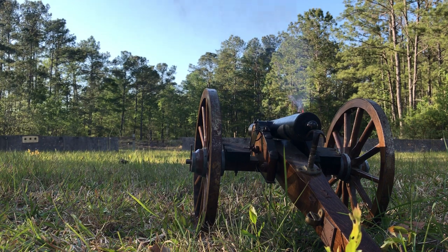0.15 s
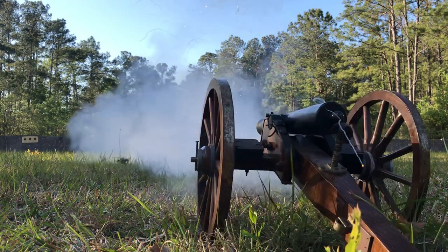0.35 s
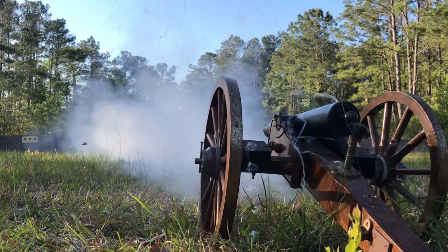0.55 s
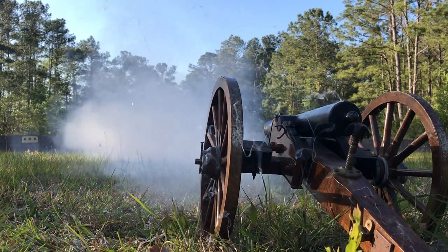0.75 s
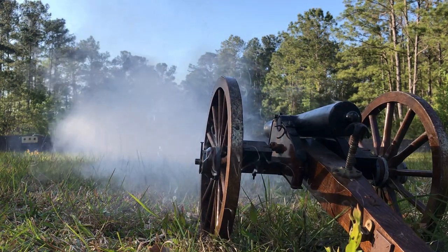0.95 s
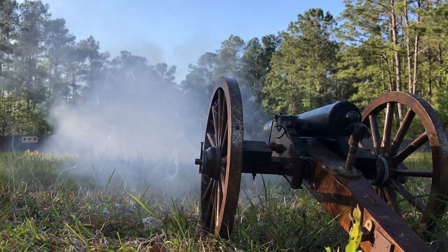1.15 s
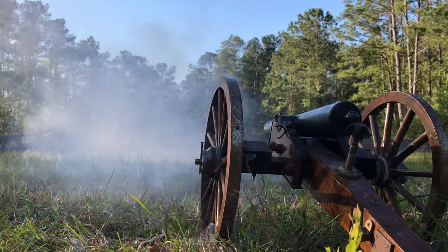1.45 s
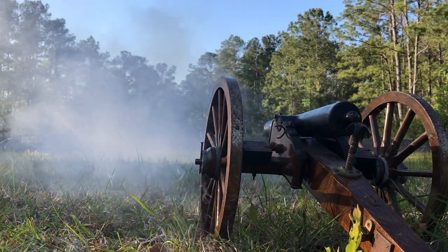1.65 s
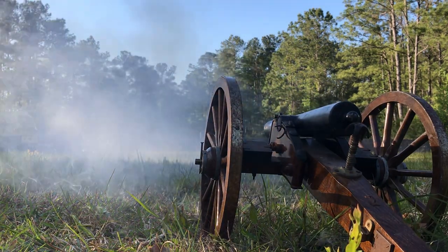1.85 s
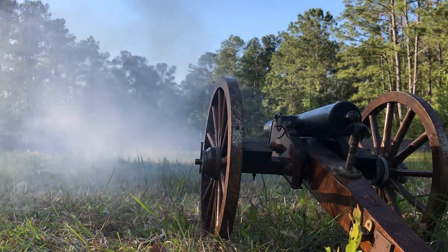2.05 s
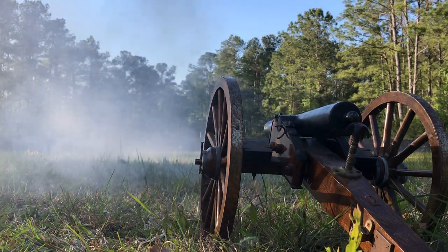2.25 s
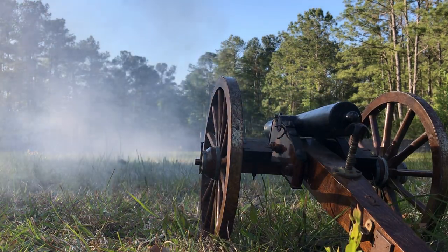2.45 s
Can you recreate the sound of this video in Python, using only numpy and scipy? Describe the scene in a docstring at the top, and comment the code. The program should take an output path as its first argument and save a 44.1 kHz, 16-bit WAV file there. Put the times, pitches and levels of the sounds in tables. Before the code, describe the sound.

A cannon fires in a grassy field ringed by forest, heard close. Faint hiss until 0.22 s, then a primer spit and short gas whistle run into a clipped crack and deep boom at 0.25 s. Dull thuds and bright scattered hiss return until 0.85 s, with grass crackling under recoil. Rumble and roar swell near 1.1 s, darken and fade; a tiny click at 2.07 s, quiet until 2.6 s.

```python
"""A muzzle-loading cannon fires in a field ringed by forest: primer spit, vent whistle, boom, cracks, a deep swing.
Shaped noise makes the gas sounds; short cosine swings make the blast wave and the thuds the trees return.
The forest answers with rumble, roar and a hiss that dulls with distance, while the carriage recoils in dry grass.
A close camera overloads on the blast and turns its gain down; a very deep rumble of wind comes in late."""
import sys
import numpy as np
from scipy import signal
from scipy.fft import rfft, irfft, next_fast_len
from scipy.io import wavfile
from scipy.ndimage import uniform_filter1d, map_coordinates

SR = 44100
rng = np.random.default_rng(int(sys.argv[2]) if len(sys.argv) > 2 else 0)


def transcribe(signal):
    """Save signal, clipped to [-1, 1], as a 16-bit WAV file at the path in sys.argv[1]."""
    frames = np.atleast_2d(signal).T
    limited = np.clip(frames, -1, 1)
    pcm = np.round(limited * 32767).astype(np.int16)
    wavfile.write(sys.argv[1], SR, pcm)


N = 114660  # samples, 2.6 s
# All source levels are those at the microphone, ahead of the gain control in record().


def amp(db):
    """Decibels to gain."""
    return 10 ** (np.asarray(db) / 20)


def clock():
    """The time of every sample in seconds."""
    return np.arange(N) / SR


def along(points, hz):
    """Interpolates (f/Hz, level/dB) points on a log frequency axis."""
    f, v = np.transpose(points)
    return np.interp(np.log(hz + 1), np.log(f + 1), v)


def level(points):
    """Gain per sample from (t/s, level/dB) points, silent before the first."""
    s, db = np.transpose(points)
    return amp(np.interp(clock(), s, db, left=-200))


def filtered(x, response):
    """x times a response of frequency, padded so that the end does not wrap onto the start."""
    m = next_fast_len(N + SR // 2)
    hz = np.fft.rfftfreq(m, 1 / SR)
    return irfft(rfft(x, m) * response(hz), m)[:N]


def noise(spectrum, grain=0):
    """Coloured noise of rms 1; grain makes it spiky."""
    spikes = np.exp(grain * np.clip(rng.standard_normal(N), -2, 2))
    white = rng.standard_normal(N) * spikes
    x = filtered(white, lambda hz: amp(along(spectrum, hz)))
    return x / x.std()


def steady(x, size):
    """Noise with its power evened out over size samples."""
    power = np.abs(uniform_filter1d(x * x, size))
    return x / np.sqrt(power + 1e-9)


def burst(start, rise, hold, t60):
    """Attack, hold and exponential release, all times in seconds."""
    t = clock() - start
    attack = np.clip(t / rise, 0, 1) ** 2
    return attack * amp(-60 * np.maximum(t - rise - hold, 0) / t60)


def faded(x, db_per_s):
    """Each frequency loses its own dB per second: a later return has travelled a longer path."""
    shot_s = 0.27  # the paths count from here
    hz, t, z = signal.stft(x, SR, nperseg=1024)
    loss_db = db_per_s(hz)[:, None] * np.maximum(t - shot_s, 0)
    return signal.istft(z * amp(-loss_db), SR, nperseg=1024)[1][:N]


def thud(s, hz, width):
    """A short pressure swing around one trough at s, under a bell curve width seconds wide."""
    t = clock() - s
    return -np.cos(2 * np.pi * hz * t) * np.exp(-(t / width) ** 2)


def wobble(rate):
    """A smooth random curve, rate knots a second."""
    return map_coordinates(rng.standard_normal(size=2000), [clock() * rate], mode="wrap")


def floor():
    """The faint constant hiss under everything: coloured noise."""
    # colour of the hiss: f/Hz, level/dB
    floor_colour = [(30, 8), (200, 5.5), (600, -1), (1000, -5.5), (1900, 1), (2900, -5), (4400, 2),
                    (7000, -2), (9000, -0.5), (10500, -6), (12000, -1), (15500, -2.5)]
    return amp(-74.5) * noise(floor_colour)


def boom():
    """The body of the muzzle blast: low noise with an even power, soft in its rise."""
    # colour of the boom: f/Hz, level/dB
    boom_colour = [(30, -29.5), (90, -8.5), (250, -1.5), (350, -5.5), (480, 0.5), (620, -8), (800, -18.5),
                   (1400, -25), (4000, -54)]
    return amp(-18) * steady(noise(boom_colour), size=600) * burst(.222, rise=.02, hold=.033, t60=.2)


def primer():
    """The primer spits: a short burst of spiky noise."""
    # colour of the spit: f/Hz, level/dB
    primer_colour = [(60, -4), (600, 4), (1600, -13.5), (4000, -12), (7000, -10), (15000, -19.5)]
    return amp(-32.5) * noise(primer_colour, grain=.5) * burst(.2225, rise=.0011, hold=.008, t60=.05)


def vent_jet():
    """Gas whistles out of the vent before the main crack: a narrow band of noise."""
    # colour of the whistle: f/Hz, level/dB
    jet_colour = [(1800, -30), (2600, -3), (3100, -0.5), (3800, -26.5), (6000, -45)]
    return amp(-32.5) * noise(jet_colour) * burst(.232, rise=.005, hold=.009, t60=.02)


def punches():
    """The expanding gas punches, and the ground gives its first returns: bursts of one low noise."""
    # each punch: t/s, level/dB, hold/s
    punch_times = [(0.2376, -9, .005), (0.266, -14, .007), (0.299, -25, .005), (0.34, -26, .004)]
    # colour of the punches: f/Hz, level/dB
    punch_colour = [(100, -20), (255, 3.5), (380, -3.5), (560, 0.5), (690, -6.5), (900, -23), (2000, -48)]
    envelope = sum(amp(db) * burst(s, rise=.0022, hold=hold, t60=.025) for s, db, hold in punch_times)
    return steady(noise(punch_colour), size=300) * envelope


def cracks():
    """The muzzle gas cracks: bursts of bright noise with an almost instant rise."""
    # each crack: t/s, level/dB, hold/s, t60/s
    crack_times = [(.2462, -10.5, 0.01, 0.02), (0.2595, -17, .003, .038)]
    # colour of the cracks: f/Hz, level/dB
    crack_colour = [(100, -19.5), (500, -3.5), (950, 5), (1250, -5.5), (1550, -4.5), (2200, -6), (4000, -6),
                    (8000, -10.5), (15000, -17)]
    envelope = sum(amp(db) * burst(s, rise=.0003, hold=hold, t60=t60) for s, db, hold, t60 in crack_times)
    return steady(noise(crack_colour, grain=.5), size=200) * envelope


def blast_swing():
    """The one deep push and pull of the blast wave."""
    return amp(-7.5) * thud(.2735, hz=55, width=.016)


def forest_rumble():
    """The long low rumble from the forest; its deepest bass fades sooner."""
    # course of the rumble: t/s, level/dB
    rumble_course = [(.25, -42), (.29, -25), (.37, -36.5), (.55, -36), (.71, -39), (.8, -36), (.97, -38.5),
                     (1.12, -35.5), (1.25, -41), (1.55, -45), (1.95, -50.5), (2.6, -53)]
    # colour of the rumble before its fading: f/Hz, level/dB
    rumble_colour = [(20, -43), (40, -13), (65, 1), (100, -1), (160, 5), (210, 3.5), (275, 2.5),
                     (350, -15.5), (600, -63.5)]
    bass_loss = 1.5  # dB per second, less and less above about 110 Hz
    rumble = steady(noise(rumble_colour), size=3000)
    return level(rumble_course) * faded(rumble, lambda hz: bass_loss / (1 + (hz / 110) ** 4))


def tree_line_roar():
    """The roar from the far tree line, surging slightly at random."""
    # course of the roar: t/s, level/dB
    roar_course = [(.25, -70), (.3, -36), (.42, -44), (.7, -48.5), (1.04, -44.5), (1.35, -50.5),
                   (1.6, -54.5), (1.85, -59), (2.2, -62.5), (2.6, -67.5)]
    # colour of the roar: f/Hz, level/dB
    roar_colour = [(150, -30.5), (330, -1), (440, 0), (600, -4), (720, -7.5), (850, -15.5), (1150, -21),
                   (2000, -37.5), (4000, -71)]
    surges = amp(.7 * wobble(rate=18))
    return level(roar_course) * steady(noise(roar_colour), size=3000) * surges


def foliage_hiss():
    """Countless trunks and leaves scatter the blast; the air takes the treble from the longer paths."""
    # course of the hiss, before air absorption: t/s, level/dB
    hiss_course = [(.25, -85), (.28, -34.5), (.355, -43), (.372, -34.5), (.42, -37.5), (.44, -39),
                   (.46, -36.5), (.53, -32.5), (.67, -42), (.85, -41), (1.15, -47.5), (1.5, -57.5),
                   (2, -66.5), (2.6, -73.5)]
    # colour of the hiss, before air absorption: f/Hz, level/dB
    hiss_colour = [(300, -25.5), (800, -5.5), (1150, -10), (1400, -1), (1700, -2), (2150, 1.5), (3000, 0.5),
                   (4500, -1.5), (7000, -3.5), (15000, -18)]
    # stronger returns from single trees: t/s, level/dB over the hiss, width/s
    slaps = [(0.2855, 3, 0.0015), (0.423, 6.5, 0.0063), (0.457, 0, .003), (0.47, 1.5, 0.0023),
             (0.532, 2, 0.0035)]
    air_db_per_s, air_power = 1.5, 1.973  # loss at 1 kHz, and its growth with frequency
    slaps_db = sum(db * np.exp(-((clock() - s) / width) ** 2) for s, db, width in slaps)
    clumps_db = 1.3 * wobble(rate=80)
    leaves = noise(hiss_colour, grain=.72) * amp(slaps_db + clumps_db)
    return level(hiss_course) * faded(leaves, lambda hz: air_db_per_s * (hz / 1000) ** air_power)


def grass():
    """Dry grass crushed under the recoiling carriage: bright, spiky noise."""
    # course of the roll through the grass: t/s, level/dB
    roll_course = [(.25, -69), (.28, -43), (.33, -47.5), (.4, -49), (.44, -58.5), (.48, -52), (.6, -59.5),
                   (.68, -60.5), (.72, -84), (1.1, -87), (1.3, -81)]
    # colour of the grass: f/Hz, level/dB
    grass_colour = [(500, -15), (3000, 7.5), (6000, 1), (9500, -3), (13000, -4), (16000, -7)]
    return level(roll_course) * noise(grass_colour, grain=.8)


def echoes():
    """Ground and stands of trees return the blast as distinct dull thuds."""
    # each echo: t/s, peak level/dB, f/Hz
    echo_times = [(0.3464, -14, 152), (.377, -25.5, 198), (0.407, -25, 207), (0.4744, -20, 242),
                  (0.571, -25, 238), (0.65, -25.5, 250), (0.746, -24, 196), (0.783, -28, 208),
                  (.797, -24.5, 185), (.826, -24, 172), (1.153, -35.5, 190.5), (1.622, -33, 191)]
    return sum(amp(db) * thud(s, hz, width=.0045) for s, db, hz in echo_times)


def stalk_snaps():
    """Dry stalks snap under the wheels: very short bursts of treble noise."""
    # each snap: t/s, level/dB
    snap_times = [(0.5434, -46), (.642, -57), (.675, -54), (0.684, -56)]
    # colour of the snaps: f/Hz, level/dB
    snap_colour = [(2000, -20), (8000, -5.5), (12500, -0.5), (16000, -0.5)]
    envelope = sum(amp(db) * burst(s, rise=.0005, hold=.0009, t60=.014) for s, db in snap_times)
    return noise(snap_colour) * envelope


def fitting_clicks():
    """The carriage fittings click: tiny broadband bursts."""
    # each click: t/s, level/dB, t60/s
    click_times = [(.894, -61.5, 0.012), (.926, -62, .015), (1.197, -65, 0.013), (1.355, -65.5, 0.01976),
                   (2.0677, -50, 0.0046), (2.072, -55.5, 0.021), (2.078, -64.5, .015)]
    # colour of the clicks: f/Hz, level/dB
    click_colour = [(200, -0.5), (900, -2), (2000, -2.5), (3300, -11), (5500, 2), (9000, -3), (12500, -1.5),
                    (16000, -6.5)]
    envelope = sum(amp(db) * burst(s, rise=.00025, hold=.001, t60=t60) for s, db, t60 in click_times)
    return noise(click_colour) * envelope


def wheel_scuff():
    """The wheels scuff: one softer burst of spiky noise."""
    # colour of the scuff: f/Hz, level/dB
    scuff_colour = [(1500, 7), (3700, 9.5), (6000, -4), (9000, -30)]
    return amp(-67) * noise(scuff_colour, grain=.44) * burst(1.352, rise=.0274, hold=.031, t60=.36)


def wind_rumble():
    """A late, very deep rumble of wind: slow-fading noise of even power."""
    # colour of the wind: f/Hz, level/dB
    wind_colour = [(15, -20), (30, -4), (42, -1), (60, -6), (120, -29), (300, -58)]
    return amp(-65.5) * steady(noise(wind_colour), size=8000) * burst(1.4, rise=.1, hold=.081, t60=7)


def scene():
    """The shot, the carriage, the answers of the forest and the wind over a faint hiss, on one channel."""
    shot = boom() + primer() + vent_jet() + punches() + cracks() + blast_swing()
    forest = forest_rumble() + tree_line_roar() + foliage_hiss() + echoes()
    carriage = grass() + stalk_snaps() + fitting_clicks() + wheel_scuff()
    return (floor() + shot + forest + carriage + wind_rumble())[None]


def record(dry):
    """Gain stays high until a loud sound pulls it down for good; peaks clip softly; the band ends steeply."""
    quiet_gain_db, unity_from_db = 17.5, -21.5  # highest gain; peak level from which the gain is 0 dB
    ceiling, top_hz = .7, 15900  # overload limit of the amplitude; upper end of the band
    loudest_so_far = np.maximum.accumulate(np.abs(dry[0])) + 1e-9
    gain = np.clip(amp(unity_from_db) / loudest_so_far, 1, amp(quiet_gain_db))
    x = dry[0] * gain
    clipped = x / (1 + (x / ceiling) ** 8) ** (1 / 8)
    return filtered(clipped, lambda hz: hz < top_hz)[None]


dry = scene()
out = record(dry)
transcribe(out)
```